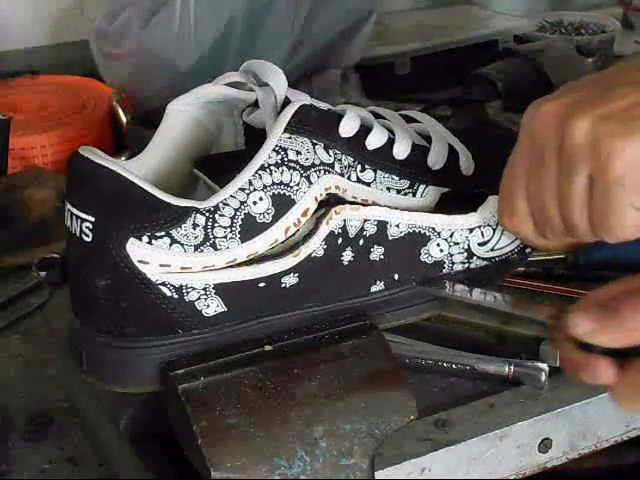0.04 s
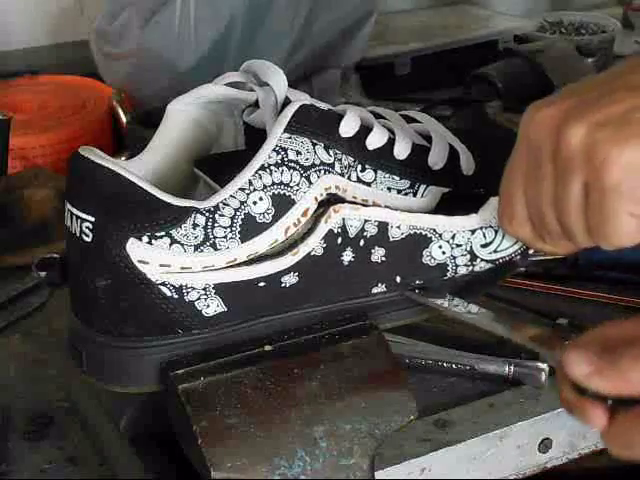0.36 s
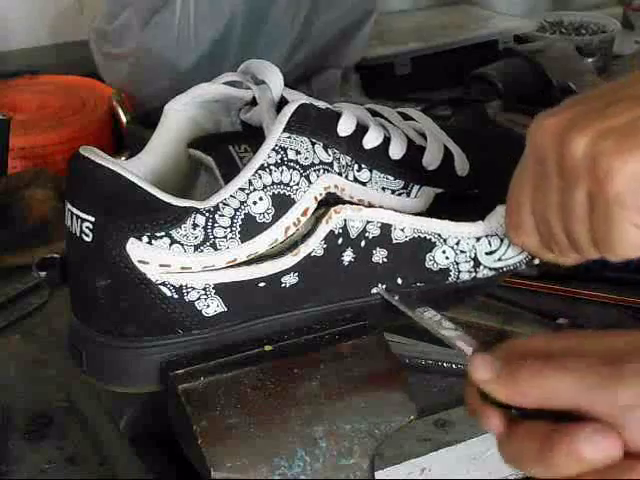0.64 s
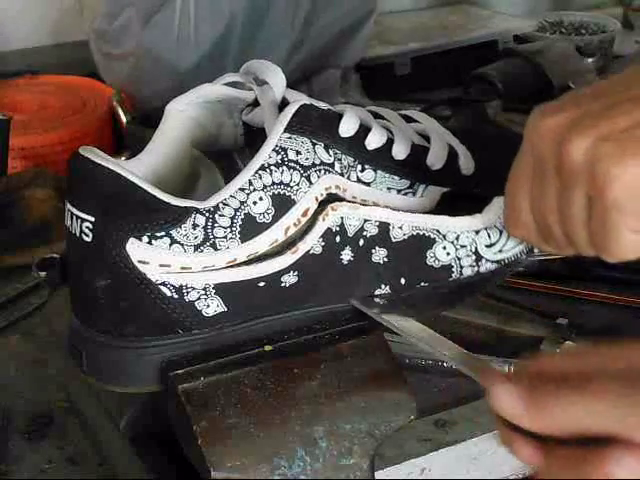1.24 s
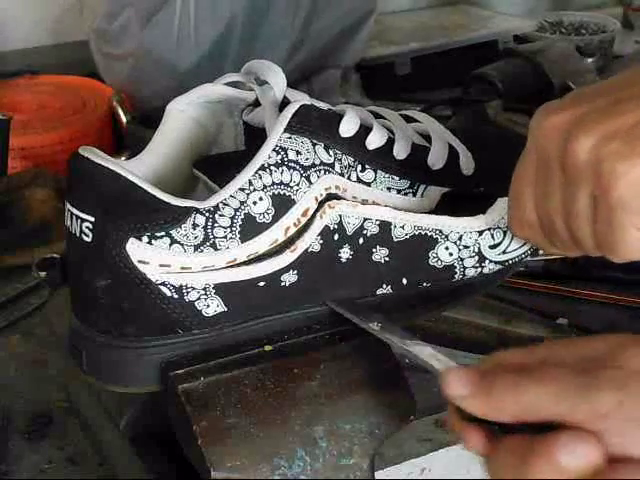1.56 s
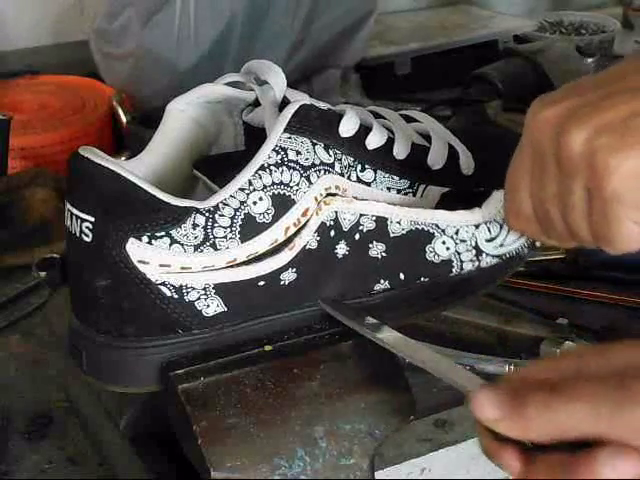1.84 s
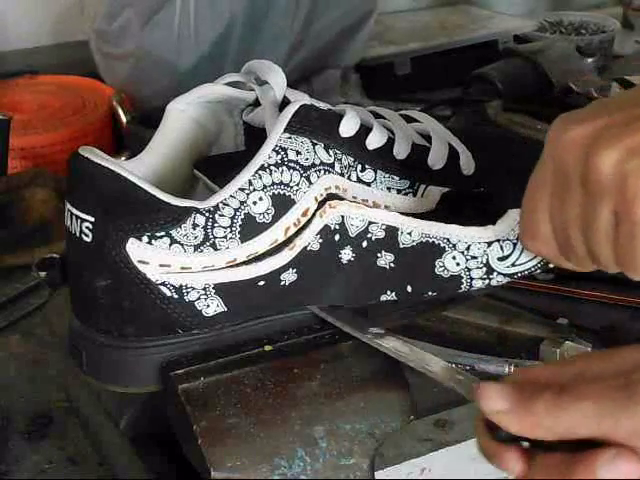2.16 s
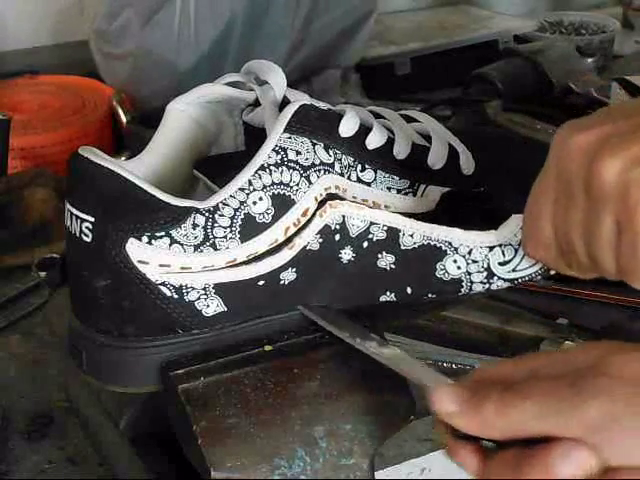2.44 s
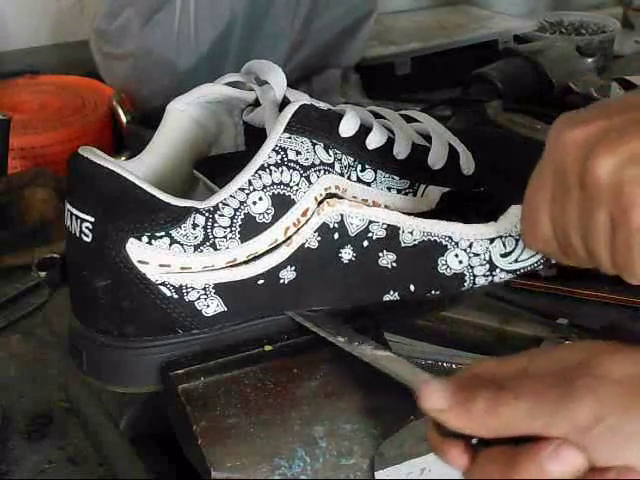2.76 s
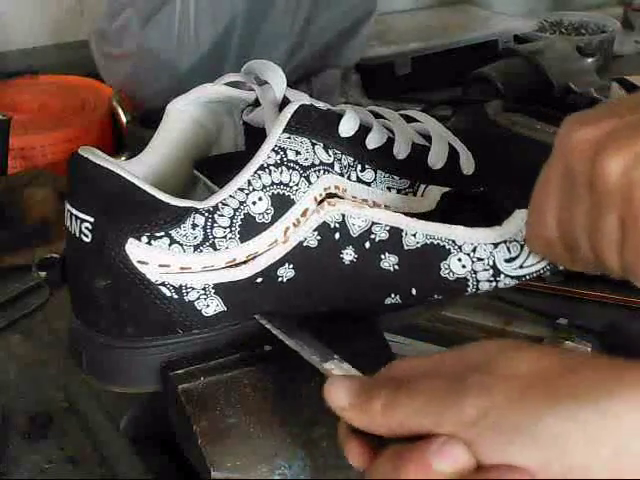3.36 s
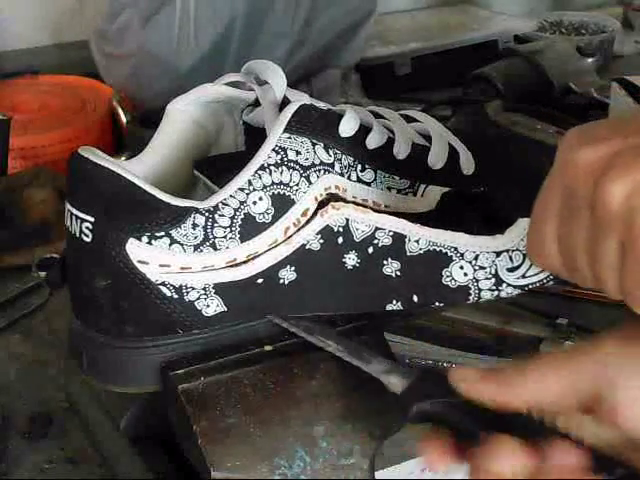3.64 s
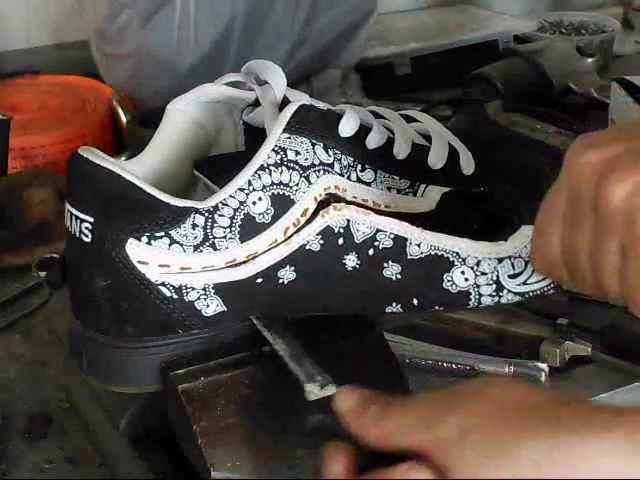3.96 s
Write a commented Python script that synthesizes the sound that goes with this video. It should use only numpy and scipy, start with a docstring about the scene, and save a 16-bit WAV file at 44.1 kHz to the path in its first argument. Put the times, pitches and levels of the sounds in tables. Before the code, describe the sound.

A knife cuts into a rubber shoe sole in short, scratchy strokes with small snaps.

```python
"""A knife cuts a groove along the rubber sole of a canvas shoe in short strokes, close by in a quiet
workshop. The edge sticks and slips through the rubber; this friction, fine tearing and single sharp
snaps excite the damped resonances of the sole and the blade. The tip clicks once as it is set in,
the rubber squeaks faintly on the steel, and a low rumble fills the room."""
import sys
import numpy as np
from scipy import signal
from scipy.fft import rfft, irfft
from scipy.io import wavfile
from scipy.ndimage import uniform_filter1d

SR = 44100
rng = np.random.default_rng(int(sys.argv[2]) if len(sys.argv) > 2 else 0)


def bounce(signal):
    """Save signal as a 16-bit WAV file at the path given by the first command-line argument."""
    frames = np.transpose(np.atleast_2d(signal))
    limited = np.clip(frames, -1, 1)
    pcm = np.round(limited * 32767).astype(np.int16)
    wavfile.write(sys.argv[1], SR, pcm)


N = 176400

# Knife strokes: full_force_s, rise_s, hold_s, level_db, sole_db, fizz_db, pitch_ratio, edge_hz
STROKES = [ (0.09, 0.052, 0.033, -54.5, -6.5, -8.5, 1.09, 3640),
           (0.15, 0.029, .016, -47.5, -1, -7, 0.96, 3460),
           (0.32, 0.013, 0.083, -55.5, -2.5, -14, 1.24, 4900),
           (0.658, 0.044, 0.046, -38.5, 1.5, -10.5, 0.92, 2720),
           (0.843, 0.035, 0.035, -44.5, -0.5, -15.5, .98, 2900),
           (1.02, 0.028, 0.023, -54, -19.5, -9, 1.07, 2960),
           (1.128, 0.054, 0.047, -38, 0, -9.5, 1.015, 2150),
           (1.33, 0.051, 0.021, -41.5, -4.5, -16, 1, 3150),
           (1.494, 0.036, 0.088, -44.5, -7, -10, 1.053, 2514),
           (1.74, 0.058, 0.024, -54, -5.5, -14, 0.95, 3350),
           (1.785, 0.032, 0.012, -41, -3.5, -14.5, 1.05, 3220),
           (1.867, 0.011, 0.0048, -54.5, -14, -7.5, 1.08, 3200),
           (1.889, 0.0071, 0.0051, -57.5, -7, -11, 1.05, 3200),
           (1.947, 0.034, 0.035, -43.5, -9, -9.5, 1, 2250),
           (2.049, 0.045, 0.0076, -43, -4, -11.5, 1.03, 2350),
           (2.468, 0.046, 0.023, -49.5, -2, -9.5, 1.1, 3320),
           (2.534, 0.02, 0.042, -44.5, -5, -10, 1.05, 3020),
           (2.595, .03, 0.022, -42, -3, -10.5, 1.104, 2700),
           (2.76, 0.16, 0.0524, -61, -8.5, -12, 1.06, 3300),
           (2.965, 0.062, 0.024, -36.5, -1, -12.5, 1.08, 3200),
           (3.198, 0.043, 0.04, -51.5, -0.5, -13, 1.03, 2665),
           (3.362, 0.035, .02, -46, -2.5, -11, 1.09, 3700),
           (3.905, 0.031, 0.046, -51, -2, -15, 1.074, 2620), (3.974, 0.03, .02, -54, -5, -9, 1.22, 2700)]


def strokes():
    """Forced vibration: friction drives sole and blade as each stroke bites in, holds and lets go."""
    rise_db, release_db_per_s = 19, 697
    out, force, t = np.zeros(N), stick_slip(), np.arange(N) / SR
    for full_force_s, rise_s, hold_s, level_db, sole_db, fizz_db, pitch_ratio, edge_hz in STROKES:
        bite_db = -rise_db * (np.maximum(full_force_s - t, 0) / rise_s) ** 2
        effort_db = bite_db - release_db_per_s * np.maximum(t - full_force_s - hold_s, 0)
        active = np.flatnonzero(effort_db > -40)
        drive = force[:, active] * from_db(level_db + effort_db[active])
        # Modes of the sole and of the blade at a pitch ratio of one: pitch_hz, width_hz, gain_db
        sole_modes = [(295, 232, -4.5), (549, 240, -7.5), (783, 260, 1.5), (987, 277, -0.5),
                      (1260, 410, -10)]
        blade_modes = [(1840, 250, -1), (2173, 470, -1.5), (2755, 456, 1.5), (3450, 1010, -2.5),
                       (4760, 950, -7.5), (6400, 750, -17.5)]
        response = slip_response(sole_modes, blade_modes, sole_db, fizz_db, pitch_ratio, edge_hz)
        add(out, active[0] / SR, signal.fftconvolve(drive, response, axes=1).sum(axis=0))
    return out


def stick_slip():
    """Stick-slip friction: uneven pulses over two crackles, of tearing rubber and of surface fibres."""
    slips_per_s, fibres_per_s, grip_s = 170, 7000, .0038
    slip_times = np.cumsum(np.exp(.45 * rng.standard_normal(2000))) / slips_per_s
    slip_sizes = from_db(2.5 * rng.standard_normal(len(slip_times)))
    slips = np.bincount((slip_times * SR).astype(int), slip_sizes, N)[:N]
    breaks = (rng.random((2, N)) < fibres_per_s / SR) * rng.choice([-1, 1], (2, N))
    crackles = breaks * from_db(2 * rng.standard_normal((2, N)))
    grip_waver = rms_one(uniform_filter1d(rng.standard_normal(N), int(grip_s * SR)))
    force = from_db(-5) * rms_one(slips) + rms_one(crackles * from_db(3.5 * grip_waver))
    return force / np.sqrt(uniform_filter1d(force ** 2, 900) + 1e-9)  # evens out the level


def slip_response(sole_modes, blade_modes, sole_db, fizz_db, pitch_ratio, edge_hz=None):
    """Impulse response of one slip, in two rows: sole and blade together, and the torn surface's fizz."""
    # Resonances of the fizz: unscaled_pitch_hz, width_hz, gain_db
    fizz_modes = [(6100, 2000, 0), (9900, 6400, -3), (15200, 3500, -6.5), (11850, 820, -14.5)]
    sole = unit_energy(butterworth(ringing(sole_modes, pitch_ratio), 1840, "low"))
    blade = butterworth(ringing(blade_modes, pitch_ratio), 1300, "high")
    if edge_hz:  # the edge rings harder at one pitch, set by its angle in the groove
        blade = blade + from_db(-3) * resonate(blade, edge_hz, width_hz=430)
    fizz = unit_energy(butterworth(ringing(fizz_modes, pitch_ratio=.86), [4730, 15000], "band"))
    return np.array([from_db(sole_db) * sole + unit_energy(blade), from_db(fizz_db) * fizz])


def snaps():
    """Impulsive excitation: the rubber gives way at once, ringing at the pitch of the nearby strokes."""
    # Single large slips: start_s, relative_level_db, sole_db, fizz_db
    large_slips = [ (.101, -32, -17, -18), (.114, -38, -5, -16), (0.158, -31.5, -13, -15),
                   (0.6053, -36, -11, -10), (.620, -32, -20, -10), (.6375, -30, 2, -6),
                   (0.7079, -25.5, 9.5, -11), (.719, -33, 9, -18), (.840, -31, 4.5, -22),
                   (0.998, -35.5, -12, -8), (1.0548, -31.5, -19, -9.5), (1.066, -28.5, -22, -12),
                   (1.0755, -28.5, -14, -7), (1.089, -37, -12, -6), (1.1001, -17, -5.5, -19),
                   (1.1019, -18.5, -5, -4.5), (1.121, -20, -25, -29), (1.127, -26.5, 5, -16),
                   (1.1416, -13.5, -2, -27), (1.1637, -16, 0.5, -35), (1.1776, -22, -7, -22),
                   (1.3175, -37, -12.5, -17), (1.335, -32, -5, -15), (1.3404, -25.5, -0.5, -16),
                   (1.454, -32.5, -8, -19), (1.463, -39, -12, -6), (1.4782, -27.5, -4.5, -27),
                   (1.492, -39, -10, 0), (1.505, -29, -15, -13.5), (1.5779, -22.5, -5, -35),
                   (1.7768, -26.5, 4.5, -18), (1.7908, -22.5, -24, -14), (1.9245, -32, -5, -9),
                   (1.965, -27, 2, -12), (1.9835, -47, -12, 0), (2.000, -35, -5, -5), (2.0214, -36, -15, 2),
                   (2.0319, -17, -15, -15), (2.4585, -26.5, -3, -22), (2.5097, -40, -13.5, -13),
                   (2.5212, -30, -9, -20), (2.5396, -31.5, -10, -30), (2.5569, -24.5, -5, -27.5),
                   (2.600, -25.5, 0.5, -22), (2.9225, -26.5, -5, -12), (2.941, -43, -13, -12),
                   (2.9669, -28, -16, -28), (2.9929, -27.5, 4.5, -24), (3.3228, -43, -2, -3),
                   (3.346, -18, -10, -45), (3.374, -36, -15, -6), (3.669, -46, -10, -0.5)]
    # Broad, short-lived modes of sole and blade at a pitch ratio of one: pitch_hz, width_hz, gain_db
    knock_modes = [(403, 500, -2), (970, 540, 0)]
    crack_modes = [(2290, 730, 3), (3430, 1180, 0), (4800, 940, -7)]
    out = np.zeros(N)
    stroke_s, *_, stroke_ratio, _ = np.transpose(STROKES)
    for start_s, relative_level_db, sole_db, fizz_db in large_slips:
        pitch_ratio = np.interp(start_s, stroke_s, stroke_ratio)
        response = slip_response(knock_modes, crack_modes, sole_db, fizz_db, pitch_ratio).sum(axis=0)
        add(out, start_s, from_db(relative_level_db + 9) * np.convolve(splinter(), response))
    return out


def tip_click():
    """Impact and rebound: the tip strikes twice, so quickly that the ear hears one dry click."""
    # Modes struck by the tip: pitch_hz, width_hz, gain_db
    tip_modes = [(400, 190, 1.5), (720, 240, 3), (1090, 400, 0), (1610, 580, -2.5), (2750, 830, -1),
                 (3700, 680, 1), (5070, 1050, -7), (7700, 1400, -14.5), (10200, 2200, -11.5),
                 (12000, 700, -22)]
    start_s, bounce_s = .3162, .00045
    out, knock = np.zeros(N), unit_energy(ringing(tip_modes, pitch_ratio=1))
    add(out, start_s, from_db(-18) * np.convolve(splinter(), knock))
    add(out, start_s + bounce_s, from_db(-4.5) * np.convolve(splinter(), knock))
    return out


def splinter(size=400, t60_s=.0055):
    """Broadband excitation: one hard pulse trailed by tiny ones that decay exponentially."""
    trail = rng.standard_normal(size) * from_db(-60 * np.arange(size) / SR / t60_s)
    return signal.unit_impulse(size) + from_db(-8) * unit_energy(trail)


def squeaks(width_hz=130):
    """Narrowband resonance: friction noise becomes thin, unsteady tones as the blade is drawn back."""
    # Squeaks of rubber on steel: start_s, length_s, pitch_hz, level_db
    rubs = [(0.484, 0.067, 2690, -66.5), (1.646, .09, 3360, -67), (2.724, 0.11, 3270, -66)]
    out = np.zeros(N)
    for start_s, length_s, pitch_hz, level_db in rubs:
        band = resonate(rng.standard_normal(SR), pitch_hz, width_hz)
        tone = resonate(band, pitch_hz, width_hz)[:int(length_s * SR)]
        add(out, start_s, from_db(level_db) * rms_one(tone) * signal.windows.tukey(len(tone), .5))
    return out


def ringing(modes, pitch_ratio):
    """Modal superposition: damped resonances of alternating sign answer one impulse."""
    impulse = signal.unit_impulse(900)
    return sum((-1) ** k * from_db(gain_db) * resonate(impulse, pitch_hz * pitch_ratio, width_hz)
               for k, (pitch_hz, width_hz, gain_db) in enumerate(modes))


def resonate(x, pitch_hz, width_hz):
    """A damped oscillator with a gain of one at resonance."""
    radius = np.exp(-np.pi * width_hz / SR)
    feedback = [1, -2 * radius * np.cos(2 * np.pi * pitch_hz / SR), radius ** 2]
    return signal.lfilter(np.array([1, 0, -1]) * (1 - radius ** 2) / 2, feedback, x)


def workshop(x, size=26000, bench_t60_s=.017):
    """Reverberation: early scatter off bench and vice, then a tail that dies sooner in the treble."""
    # Room tail against the direct sound: frequency_hz, t60_s, level_db
    room = [(201, 0.62, 3.5), (700, 0.39, -7), (2500, 0.33, -15), (6000, 0.39, -8.5), (14000, 0.14, -8)]
    t = np.arange(size) / SR
    scatter = rng.standard_normal(size) * from_db(-60 * t / bench_t60_s) * (t > .001)
    response = from_db(-9) * unit_energy(scatter)
    edges_hz = np.geomspace(100, 18000, 9)
    for low_hz, high_hz in zip(edges_hz, edges_hz[1:]):
        centre_hz = np.sqrt(low_hz * high_hz)
        decay = unit_energy(from_db(-60 * t / at_hz(room, centre_hz)) * (t > .006))
        band = butterworth(rng.standard_normal(size), [low_hz, high_hz], "band")
        response += from_db(at_hz(room, centre_hz, column=2)) * decay * band
    return signal.fftconvolve(x, response)[:N]


def rumble(level_db=-42.5):
    """Stationary room noise: a falling spectrum gives a low rumble with a faint hiss."""
    # Spectral density of the background: frequency_hz, relative_level_db
    spectrum = [(20, 1), (44, 1), (60, -4.5), (110, -8.5), (200, -12.5), (320, -16.5), (600, -24.5),
                (1200, -31), (2500, -38.5), (4500, -41.5), (7000, -49), (12000, -50), (16000, -51.5)]
    hz = np.arange(N // 2 + 1) * SR / N
    noise = irfft(rfft(rng.standard_normal(N)) * from_db(at_hz(spectrum, hz)), N)
    return from_db(level_db) * rms_one(butterworth(noise, 13.6, "high"))


def from_db(db):
    """Decibels to amplitude ratio."""
    return 10 ** (np.asarray(db) / 20)


def rms_one(x):
    """Normalisation to an rms of one."""
    return x / np.sqrt(np.mean(x ** 2) + 1e-20)


def unit_energy(x):
    """Energy normalisation: the response passes white noise at unchanged level."""
    return x / np.sqrt(np.sum(x ** 2) + 1e-20)


def at_hz(points, hz, column=1):
    """Interpolation of a table column on a log-frequency axis."""
    table = np.array(points)
    return np.interp(np.log(hz + 1e-9), np.log(table[:, 0]), table[:, column])


def butterworth(x, hz, kind):
    """Maximally flat filtering with second-order slopes."""
    return signal.sosfilt(signal.butter(2, hz, kind, fs=SR, output="sos"), x)


def add(out, start_s, x):
    """Superposition of a sound from its start time on."""
    i = int(np.clip(start_s * SR, 0, N))
    out[i:i + len(x)] += x[:N - i]


def scene():
    """The knife's direct sound, its reverberant field and the room noise add in one channel."""
    knife = strokes() + snaps() + tip_click() + squeaks()
    return (knife + workshop(knife) + rumble())[None]


def record(dry):
    """Band limiting: an elliptic low-pass cuts the top of the treble steeply."""
    cutoff_hz = 15900
    return signal.sosfilt(signal.ellip(12, .1, 70, cutoff_hz, fs=SR, output="sos"), dry)


dry = scene()
out = record(dry)
bounce(out)
```